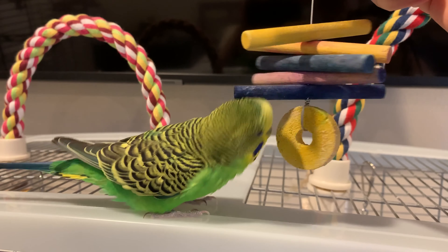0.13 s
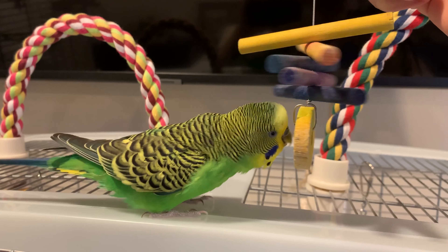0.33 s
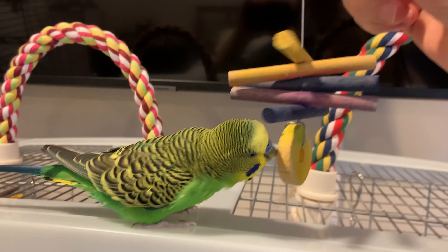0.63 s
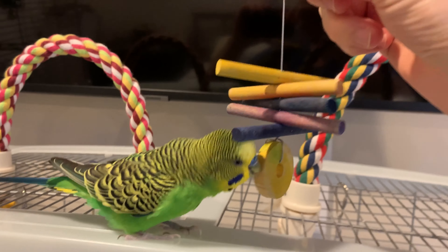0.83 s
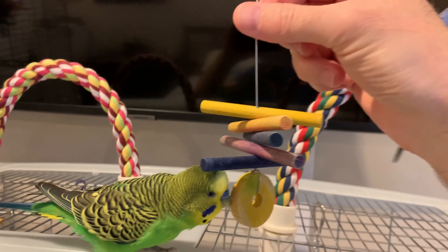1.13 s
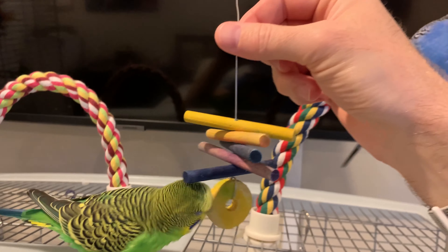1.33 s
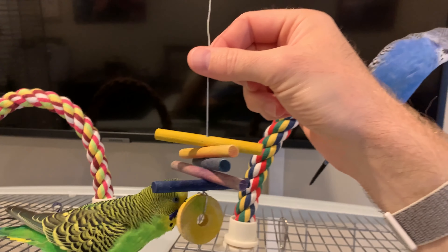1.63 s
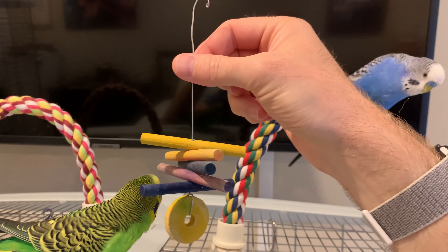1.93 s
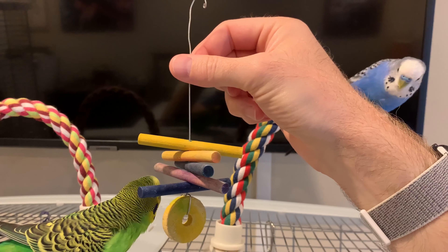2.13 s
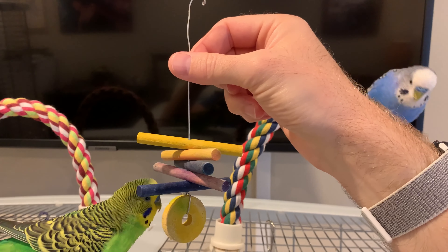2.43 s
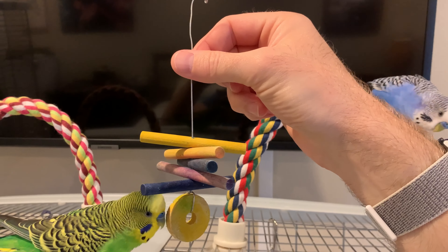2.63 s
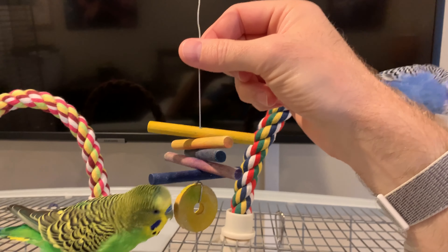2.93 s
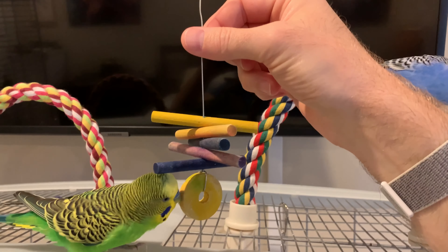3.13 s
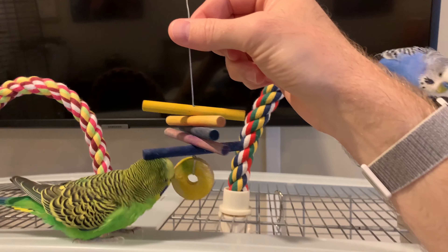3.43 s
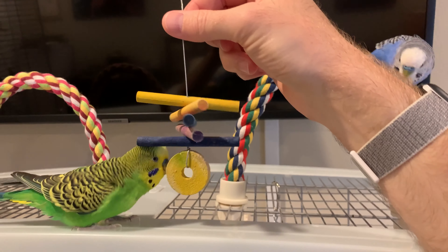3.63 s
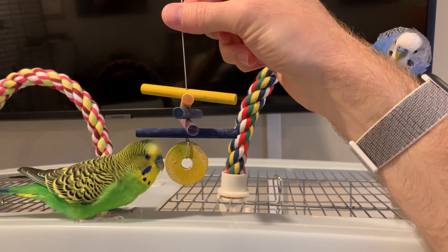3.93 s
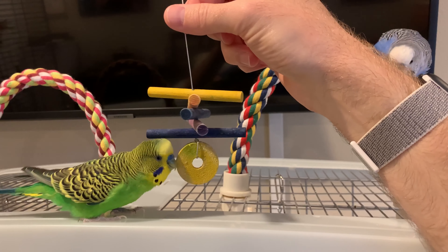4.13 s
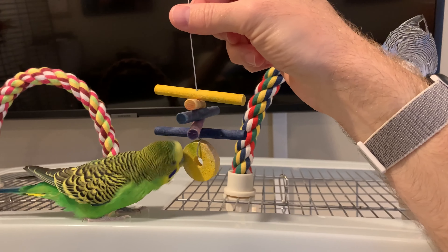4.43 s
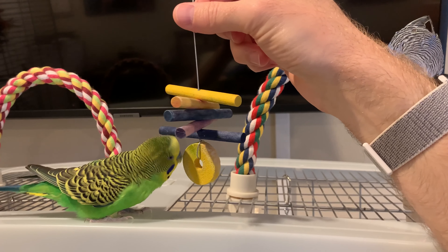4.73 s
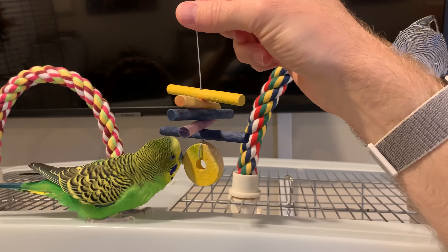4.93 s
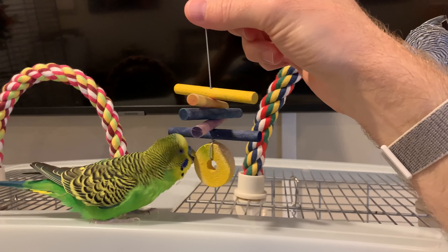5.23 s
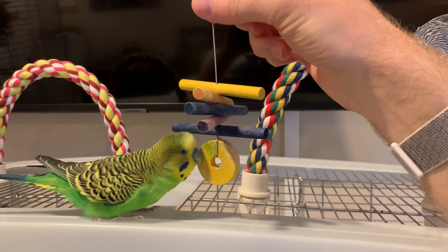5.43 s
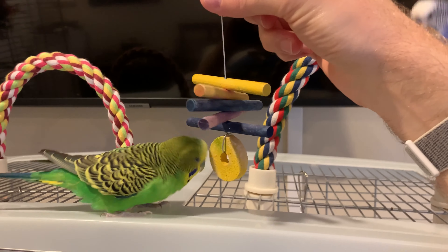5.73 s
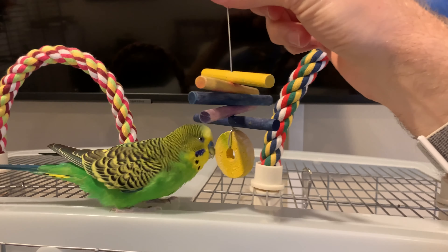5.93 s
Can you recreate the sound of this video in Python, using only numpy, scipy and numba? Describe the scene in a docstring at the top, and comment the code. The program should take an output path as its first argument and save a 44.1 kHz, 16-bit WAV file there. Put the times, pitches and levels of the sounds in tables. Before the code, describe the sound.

Dry beak clicks and gritty wooden rasps, close up, with a faint chirp, two brief squeaks and soft rustling over low room rumble.

```python
"""A low rumble and the microphone hiss lie under a quiet room; then a thin breathy hiss and pecks on wood.
A small parrot pecks and scrapes at a hanging toy of wooden sticks, close to a phone: both stir wooden modes.
Beak snaps are decaying multiples of a pitch, squeaks harmonic voices with breath, the chirp gliding noise.
Thin hisses and something soft rustling are filtered noise; a faint hum is a wavering sine."""
import sys
import numpy as np
from scipy import signal
from scipy.fft import rfft, irfft
from scipy.io import wavfile
from scipy.ndimage import uniform_filter1d
from numba import njit

SR = 44100
rng = np.random.default_rng(int(sys.argv[2]) if len(sys.argv) > 2 else 0)


def volts_from_db(level):
    """Convert decibel levels to linear amplitude ratios."""
    exponent = np.asarray(level, float) / 20
    return 10 ** exponent


def master_out(mix):
    """Clip the mix to full scale and print it as 16-bit PCM to the path in sys.argv[1]."""
    frames = np.transpose(np.atleast_2d(mix))
    ceiling = np.clip(frames, -1, 1)
    pcm = np.round(ceiling * 32767).astype(np.int16)
    wavfile.write(sys.argv[1], SR, pcm)


N = 267951


def amp_curve(rows, column=1, fade=0.0004):
    """Envelope: a dB column as gain, silent outside the table, with edges faded over fade seconds."""
    r, t = np.array(rows), np.arange(N) / SR
    edge = np.clip(np.minimum(t - r[0, 0], r[-1, 0] - t) / fade, 0, 1)
    return edge * volts_from_db(np.interp(t, r[:, 0], r[:, column]))


def curve(rows, column):
    """Linear interpolation: one column joined by straight lines in time."""
    r = np.array(rows)
    return np.interp(np.arange(N) / SR, r[:, 0], r[:, column])


def swell(start, rise, fall, db, start_db, end_db):
    """Attack and decay: rows (s, dB) climb to a peak and fall; both end levels are relative to the peak."""
    rise, fall = max(rise, .002), max(fall, .002)
    return [(start, db + start_db), (start + rise, db), (start + rise + fall, db + end_db)]


def unit(x):
    """Normalization: scaled to rms 1."""
    return x / np.sqrt(np.mean(x ** 2))


@njit
def svf(x, hz, width):
    """Resonance: a state-variable band-pass whose centre may move every sample."""
    y, b, l = np.empty(len(x)), 0., 0.
    for i in range(len(x)):
        g, k = np.tan(np.pi * hz[i] / SR), width / hz[i]
        v = (b + g * (x[i] - l)) / (1 + g * (g + k))
        b, l, y[i] = 2 * v - b, l + 2 * g * v, k * v
    return y


def band(x, hz, width):
    """Resonance at rest: a band-pass at a fixed centre."""
    return svf(x, hz * np.ones(len(x)), 1. * width)


def walk(rate):
    """Random modulation: levels held 1 / rate s and slewed; spread near 1."""
    k = int(SR / rate)
    return uniform_filter1d(np.repeat(rng.standard_normal(N // k + 1), k), k)[:N]


# spectrum of the background noise, relative: pitch_hz [Hz], density_db [dB per Hz]
FLOOR_SPECTRUM = [(20, -32), (40, -9.5), (66, -1), (102, -9), (133, -9.5), (300, -16.5), (480, -23.5),
                  (700, -28), (1900, -36), (5000, -39.5), (7500, -42.5), (9600, -37), (11800, -41.5)]
# likeness of left and right: pitch_hz [Hz], correlation [0-1]
PORT_LIKENESS = [(60, .93), (130, 0.83), (290, 0.85), (640, 0.18), (3000, .05), (7000, 0.25), (11000, 0.95)]


def noise_floor():
    """Partial coherence: coloured noise whose shared and opposed parts set how alike the ports are."""
    level_db, hiss_top_hz = -68, 12000
    log_hz = np.log(np.maximum(np.arange(N // 2 + 1) * SR / N, 1))
    hz, density_db = np.array(FLOOR_SPECTRUM).T
    colour = volts_from_db(np.interp(log_hz, np.log(hz), density_db))
    colour[log_hz > np.log(hiss_top_hz)] *= volts_from_db(-24)
    hz, correlation = np.array(PORT_LIKENESS).T
    like = np.clip(np.interp(log_hz, np.log(hz), correlation), 0, 1)
    mid, side = rfft(rng.standard_normal((2, N))) * colour * np.sqrt([1 + like, 1 - like])
    floor = volts_from_db(level_db) * unit(irfft(np.array([mid + side, mid - side]), N))
    # the low part of the noise wavers at random in level
    waver = volts_from_db(walk(8.3)) - 1
    return floor + waver * np.array([band(port, 190, 230) for port in floor])


# swells of the deep rumble: start_s [s], rise_s [s], fall_s [s], level_db [dB at the peak]
RUMBLE_SWELLS = [(0, 0.34, .3, -64), (.7, 0.7, 0.76, -68), (1.9, 0.12, 0.11, -62), (2.298, .8, 0.53, -66),
                 (4.659, 0.0096, 0.042, -55.5), (4.921, 0.026, 0.071, -60.5), (5.798, 0.28, 0.19, -60.5)]


def rumble():
    """Narrow-band noise: a deep resonance throbs at random and swells above its resting level."""
    rest_db, edge_db = -78.5, -13
    deep = band(band(rng.standard_normal(N), 75, 40), 90, 61)
    deep = unit(deep * volts_from_db(0.86 * walk(3.0)))
    swells = sum(amp_curve(swell(*r, edge_db, edge_db), 1, 0.016) for r in RUMBLE_SWELLS)
    return (volts_from_db(rest_db) + swells) * deep


# thin hisses: start_s [s], rise_s [s], fall_s [s], level_db [dB at the peak], centre_hz [Hz]
THIN_HISSES = [(0.052, 0.049, 0.033, -59.5, 7900), (3.259, 0.031, 0.054, -79, 9600),
               (4.135, 0.066, 0.03, -52.5, 8840), (5.528, 0.035, 0.0373, -50, 8870)]


def hisses():
    """Turbulent noise: air through a narrow gap, a broad peak over a wide treble skirt."""
    start_db, end_db = -11.5, -13
    out = 0
    for start, rise, fall, db, hz in THIN_HISSES:
        air = rng.standard_normal(N)
        peak = unit(band(band(air, hz, 3500.0), hz, 3500.0))
        skirt = volts_from_db(-12.0) * unit(band(band(air, 14000, 4000), 14000, 4000))
        skirt += volts_from_db(-13.5) * unit(band(air, 5350, 2300))
        level = amp_curve(swell(start, rise, fall, db, start_db, end_db), fade=0.0042)
        out = out + level * (peak + skirt)
    return out


# a faint hum that comes and goes: start_s [s], rise_s [s], fall_s [s], level_db [dB at the peak]
HUM_SWELLS = [(0.102, 0.47, 0.46, -74.5), (1.5, 0.17, 0.63, -67)]


def hum():
    """Frequency modulation: a faint sine wavers in pitch at random."""
    pitch_hz, edge_db = 329, -15
    out = 0
    for r in HUM_SWELLS:
        phase = 2 * np.pi * np.cumsum(pitch_hz + 3.3 * walk(17)) / SR
        level = amp_curve(swell(*r, edge_db, edge_db), 1, 0.061)
        out = out + np.sqrt(2) * level * np.sin(phase)
    return out


# modes of the wooden toy: pitch_hz [Hz], level_db [dB]
WOOD_MODES = [(720, -3), (900, -4), (1200, 0), (1700, -2.5), (2020, -3.5), (2460, 2.5), (2900, -9.5),
              (3250, -2), (3800, -5), (4520, -2), (5750, -1), (6600, -1), (7300, 1.5), (8300, -3),
              (9700, 1), (11500, -4), (12900, -3.5), (15000, -14)]
# pitches that part the modes into five groups: edge_hz [Hz]
MODE_GROUP_EDGES = [1450, 3100, 5000, 9000]


def wood(x, damping, scatter_db=0., bend=1.):
    """Modal response in five groups, higher modes damped more; contact scatters strength, grip bends pitch."""
    groups = np.zeros((5, len(x)))
    chances = rng.standard_normal(len(WOOD_MODES))
    for k, ((hz, db), chance) in enumerate(zip(WOOD_MODES, chances)):
        drive = band(x, hz, 0.38 * hz)
        ring = svf(drive, hz * bend * np.ones(len(x)), damping * (110 + 0.11 * hz))
        gain = (-1) ** k * volts_from_db(db + scatter_db * chance)
        groups[np.searchsorted(MODE_GROUP_EDGES, hz)] += gain * ring
    return groups


# pecks: start_s [s], level_db [dB], brightness_db [dB per step of place],
# focus_db [dB, favours the middle groups], contact_ms [ms]
PECK_BLOWS = [(0.154, -61.5, 10.5, 10, 1.9), (0.2194, -50, 13, 30, 1.8), (0.2832, -17, 10.5, 6, 1.82),
              (0.7543, -48.5, 4.5, 0, 2.5), (1.4498, -41, 0.5, 2, 1.24), (1.531, -42.5, -3, 2.5, 6.2),
              (1.571, -38.5, 2.5, -1, 2.26), (1.694, -52.5, 4, -5.5, 0.85), (2.1871, -47.5, -25, 13.5, 1.7),
              (2.547, -60.5, 3.5, -1, 1.5), (2.615, -44, -2, 8.5, 2.6), (1.177, -40.5, 2, 1, 2),
              (2.7112, -30.5, 2.5, 2.5, 3.3), (3.1041, -61.5, 2, -1, 6.5), (3.764, -56.5, -10, 8, 6.4),
              (4.13, -57.5, 4.5, 2.5, 2.2), (4.289, -44.5, 8.5, 0.5, 4.1), (4.388, -66, 8.5, -5, 2.7),
              (4.6478, -55.5, 1, -2, 0.37), (4.958, -57.5, -1.5, 0, 2.1), (5.1867, -60, -2, 12, 1.44),
              (5.3352, -49, -1.5, -1, 3.5), (5.3434, -45.5, -5, 4.5, 2.6), (5.3659, -54, 1.5, 1.5, 2.6),
              (5.6054, -55, 9.5, 3, 3.1), (5.6452, -40.5, 1.5, 1, 2.25), (5.801, -68.5, 19, 7, 2.27),
              (6.0164, -43, 1, -2.5, 1.47)]
# level of each mode group under a blow, low to high: level_db [dB]
BLOW_GROUPS = [3, -0.5, -3, -1, -8]


def pecks():
    """Impact excitation: the beak lands as a burst of tiny impacts that dies over the contact time."""
    out, t = np.zeros(N + 1024), np.arange(1024) / SR
    place = np.array([-3, -1, 1, 3, 3]) / 2  # of the groups, low to high
    for s, db, bright_db, focus_db, ms in PECK_BLOWS:
        impacts = rng.standard_normal(1024) * np.exp(-t / (max(ms, .2) / 1000))
        impacts *= np.minimum(t / 0.0033, 1)
        # the first full contact, hardest when brief
        impacts += 3.7 * np.sinc((t - .001) * SR) / max(ms, 1)
        groups = wood(impacts, 1.3, scatter_db=1.5, bend=1 + .025 * rng.standard_normal())
        groups /= np.abs(groups).max(axis=1, keepdims=True)
        group_db = db + np.array(BLOW_GROUPS) + bright_db * place - focus_db * place ** 2
        i = int(s * SR)
        out[i:i + 1024] += volts_from_db(group_db) @ groups
    return out[:N]


# beak snaps: start_s [s], level_db [dB, first multiple], pitch_hz [Hz],
# step_db [dB per multiple], t60_ms [ms, first multiple]
BEAK_SNAPS = [(0.2843, -10, 4153, -18.5, 10), (1.177, -31.5, 2093, 2, 13), (1.1785, -32.5, 2310, -24, 26),
              (1.1875, -38, 1980, -9.5, 24), (2.691, -39.5, 1700, -15, 40), (2.7175, -33.5, 2150, -12, 48)]


def snaps():
    """Cavity resonance: a shut beak rings up to seven multiples of the mouth's pitch, the higher dying sooner."""
    out, t = np.zeros(N + 2048), np.arange(2048) / SR
    for s, db, hz, step_db, t60_ms in BEAK_SNAPS:
        detune = 1 + .01 * rng.standard_normal(7)
        ring = 0
        for k in range(7):
            if (k + 1) * hz < SR / 3:
                decay_db = 60 * t * (1 + 0.2 * k) / (max(t60_ms, 3) / 1000)
                sine = np.sin(2 * np.pi * (k + 1) * hz * detune[k] * t)
                ring = ring + volts_from_db(step_db * k - decay_db) * sine
        i = int(s * SR)
        out[i:i + 2048] += volts_from_db(db) * ring * np.minimum(t / 0.001, 1)
    return out[:N]


# scrapes: start_s [s], rise_s [s], fall_s [s], level_db [dB at the peak], brightness_db [dB]
SCRAPE_STROKES = [(.695, 0.0046, 0.22, -66.5, 15), (.753, 0.0017, 0.055, -42.5, 16.5),
                  (1.344, 0.11, 0.0098, -51.5, -2), (1.514, 0.021, 0.1, -44.5, 2),
                  (1.64, 0.021, 0.19, -48, 1.5), (1.66, 0.12, 0.045, -49, -2.5),
                  (1.76, 0.12, 0.09, -46, 0.5), (2.667, 0.029, 0.051, -45, -2),
                  (2.709, 0.0085, 0.029, -36.5, -1), (3.107, .004, 0.043, -63, 18),
                  (4.299, 0.004, 0.21, -57.5, 0), (4.386, 0.031, 0.078, -47.5, 4.5),
                  (4.41, 0.047, 0.034, -50, 1), (5.615, 0.033, 0.0089, -41.5, 8)]
# how rubbing stirs the mode groups, low to high: level_db [dB]
RUB_GROUPS = [-9, 3, -3.5, 0, -8]
# how far each mode group, low to high, follows the brightness: share [dB per dB]
BRIGHTNESS_SHARE = [-0.43, -0.59, -0.3, -0.086, 0.91]


def scrapes():
    """Stick-slip friction: slips along the grain are gritty bursts that die away and stir the wood's modes."""
    start_db, end_db = -13, -19.5
    slip_hz, slip_depth_db = 175, 14  # mean-log slip rate, and how far each fades before the next
    out, half = np.zeros(N), SR // 2
    for start, rise, fall, db, bright_db in SCRAPE_STROKES:
        grit = rng.standard_normal(half) * volts_from_db(1.47 * rng.exponential(size=half))
        grit *= volts_from_db(1.4 * walk(54.7)[:half])
        cycle = np.cumsum(slip_hz * volts_from_db(3 * walk(90)[:half])) / SR
        slip_level_db = 2.2 * rng.standard_normal(half)[cycle.astype(int)]
        slips = grit * volts_from_db(-slip_depth_db * (cycle % 1) + slip_level_db)
        groups = wood(slips, .42, scatter_db=1.6 * walk(9)[:half], bend=1 + .012 * walk(14)[:half])
        groups = np.array([unit(g) for g in groups])
        group_db = np.array(RUB_GROUPS) + bright_db * np.array(BRIGHTNESS_SHARE)
        stroke = unit(volts_from_db(group_db) @ groups)
        a = int(start * SR)
        b = min(a + half, N)
        level = amp_curve(swell(start, rise, fall, db, start_db, end_db))
        out[a:b] += level[a:b] * stroke[:b - a]
    return out


# rustles: start_s [s], rise_s [s], fall_s [s], body_db [dB at the peak], crackle_db [dB at the peak]
SOFT_RUSTLES = [(0.984, 0.1, 0.032, -64.5, -64.5), (1.092, 0.022, 0.24, -60, -58),
                (1.149, 0.088, 0.37, -65, -65), (1.349, 0.33, 0.3, -60, -59.5),
                (2.251, 0.094, 0.13, -62, -60.5), (2.378, 0.038, 0.28, -64, -67.5),
                (2.966, 0.036, 0.11, -78.5, -62.5), (2.973, 0.14, 0.19, -58.5, -99.5),
                (5.864, 0.0071, 0.16, -63.5, -58.5), (5.9, 0.13, 0.21, -54.5, -59.5)]


def rustle():
    """Friction noise: soft rubbing gives a dull body and a brighter crackling layer that dies sooner."""
    start_db, body_end_db, crackle_end_db = -9, -16, -31.5
    rub = rng.standard_normal((2, N)) * volts_from_db(2.5 * walk(60))
    body, crackle = 0, 0
    for s, rise, fall, body_db, crackle_db in SOFT_RUSTLES:
        body = body + amp_curve(swell(s, rise, fall, body_db, start_db, body_end_db), 1, 0.014)
        crackle = crackle + amp_curve(swell(s, rise, fall, crackle_db, start_db, crackle_end_db), 1, 0.015)
    out = []
    for x in (rub[0] + 0.42 * rub[1], rub[0] - 0.28 * rub[1]):
        dull = unit(band(band(x, 215, 184), 190, 570))
        bright = unit(band(band(band(x, 1300, 1330), 870, 570), 2040, 3600))
        out.append(body * dull + crackle * bright)
    return np.array(out)


# the two breathy voices of a chirp, a list each: time_s [s], pitch_hz [Hz], level_db [dB]
CHIRP_VOICES = [
    [(2.088, 1434, -81.5), (2.12, 1964, -61), (2.148, 2430, -60.5), (2.164, 2530, -40.5),
     (2.176, 2630, -55), (2.192, 2520, -61), (2.215, 2750, -68)],
    [(2.097, 1485, -68), (2.118, 1634, -54), (2.136, 1338, -57.5), (2.164, 1830, -58.5),
     (2.176, 1040, -47.5), (2.19, 1300, -59), (2.215, 1420, -66)],
]


def chirp():
    """Source and filter: each voice is noise in a narrow gliding resonance."""
    out = 0
    for r in CHIRP_VOICES:
        pitch = curve(r, 1)
        voice = svf(svf(rng.standard_normal(N), pitch, 272.0), pitch, 300.0)
        out = out + amp_curve(r, 2) * unit(voice)
    return out


# squeaks, a list each: time_s [s], pitch_hz [Hz], level_db [dB]
SQUEAK_GLIDES = [
    [(2.562, 850, -60.5), (2.585, 883, -52.5), (2.603, 938, -41.5), (2.614, 1002, -44.5),
     (2.624, 920, -66.5)],
    [(3.775, 900, -84.5), (3.83, 743.5, -59.5), (3.85, 708, -51), (3.872, 706.5, -47.5),
     (3.885, 851, -45.5), (3.897, 897, -42.5), (3.912, 869, -43.5), (3.922, 918.5, -45),
     (3.933, 860, -43.5), (3.948, 800, -49.5), (3.968, 678, -57.5)],
]
# partials of each squeak at its loudest, from the first up: level_db [dB]
SQUEAK_PARTIALS = [(2, -16, -21, -10.5, -29, -27, -31, -44, -21.5, -27.5),
                   (1, -1.5, -7.5, -8.5, -21, -23, -25, -10.5)]
# roughness of each squeak: share [ratio]
SQUEAK_ROUGHNESS = [.14, .75]
# breath of each squeak at its loudest, relative to the glide's level: level_db [dB]
SQUEAK_BREATH = [-32, -5.5]
# bands the breath fills: centre_hz [Hz], width_hz [Hz], level_db [dB]
BREATH_BANDS = [(977, 780, -3), (2350, 700, 0), (4900, 2900, -3), (7900, 8900, -2), (11800, 1300, -16)]


def squeaks():
    """Harmonic series: effort lifts overtones, roughness shakes pitch and partials, air puffs once a cycle."""
    out = 0
    settings = zip(SQUEAK_GLIDES, SQUEAK_PARTIALS, SQUEAK_ROUGHNESS, SQUEAK_BREATH)
    for r, partials_db, rough, breath_db in settings:
        slack_db = curve(r, 2) - np.array(r)[:, 2].max()  # 0 at full effort, negative below
        phase = 2 * np.pi * np.cumsum(curve(r, 1) * (1 + 0.054 * rough * walk(400))) / SR
        tone = 0
        for k, db in enumerate(partials_db):
            shake_db = (3 + 3.4 * np.sqrt(k)) * rough * walk(160)
            tone = tone + volts_from_db(db + (0.07 + 0.3 * k) * slack_db + shake_db) * np.sin((k + 1) * phase)
        air = rng.standard_normal(N) * (1 + np.sin(phase)) * volts_from_db(1.9 * walk(170))
        breath = 0
        for hz, width, db in BREATH_BANDS:
            filled = unit(band(band(air, hz, width), hz, width))
            breath = breath + volts_from_db(db + 0.13 * slack_db * hz / 1000) * filled
        voice = np.sqrt(2) * tone + volts_from_db(breath_db - 0.83 * slack_db) * breath
        out = out + amp_curve(r, 2, 0.005) * voice
    return out


# the room's tail: centre_hz [Hz], t60_s [s], level_db [dB]
ROOM_TAIL = [(779, 0.35, -4), (1621, 0.078, 0.5), (3400, 0.25, -2), (6600, 0.045, -5), (12000, 0.19, -27)]


def room():
    """Reverberation: quick random early echoes, then the room's tail, drawn separately for each port."""
    near_db, near_t60_s = -11, 0.035
    t = np.arange(SR // 2) / SR
    ports = np.zeros((2, len(t)))
    for port in ports:
        near = rng.standard_normal(len(t)) * volts_from_db(-60 * t / near_t60_s) * (t > .0006)
        port += volts_from_db(near_db) * near / np.linalg.norm(near)
        for hz, t60, db in ROOM_TAIL:
            tail = band(rng.standard_normal(len(t)), hz, hz)
            tail *= volts_from_db(-60 * t / t60) * np.minimum(t / 0.0093, 1)
            port += volts_from_db(db) * tail / np.linalg.norm(tail) * np.sqrt(hz / SR)
    return ports


# direct sound bent round the phone to the left port: pitch_hz [Hz], delay_ms [ms], level_db [dB over the right]
LEFT_PORT_PATH = [(900, .08, -3), (2200, .11, 1), (4600, .05, 4), (7500, .027, 0)]


def scene():
    """Superposition: bird and toy reach both ports by diffraction and reverberation, over the other layers."""
    rub_echo_db = -2  # rubbing reaches the walls less than blows do
    voice_echo_db = -5  # the beak points at the phone, so less of the voice reaches the walls
    blows, rubs, voice = pecks(), scrapes(), snaps() + squeaks() + chirp()
    right = blows + rubs + voice
    f = np.arange(N // 2 + 1) * SR / N
    hz, ms, db = np.array(LEFT_PORT_PATH).T
    delay = np.exp(-2j * np.pi * f * np.interp(f, hz, ms) / 1000)
    left = irfft(rfft(right) * volts_from_db(np.interp(f, hz, db)) * delay, N)
    to_walls = blows + volts_from_db(rub_echo_db) * rubs + volts_from_db(voice_echo_db) * voice
    echoes = np.array([signal.fftconvolve(to_walls, port)[:N] for port in room()])
    background = noise_floor() + rumble() + hum()
    return np.array([left, right]) + echoes + hisses() + rustle() + background


def band_limit(x):
    """A steep low-pass at the top of the band."""
    return signal.sosfilt(signal.butter(12, 16530, fs=SR, output="sos"), x)


def record(dry):
    """Mid and side: low-passing the side merges the two channels in the top treble."""
    mid, side = (dry[0] + dry[1]) / 2, (dry[0] - dry[1]) / 2
    side = signal.sosfiltfilt(signal.butter(4, 10500, fs=SR, output="sos"), side)
    return band_limit(np.array([mid + side, mid - side]))


dry = scene()
out = record(dry)
master_out(out)
```